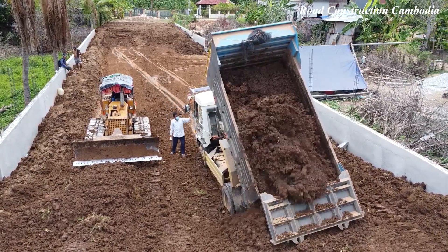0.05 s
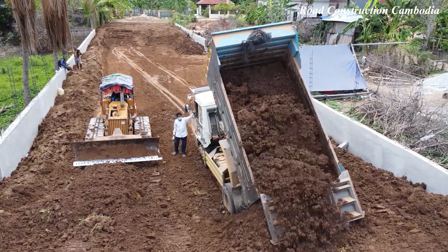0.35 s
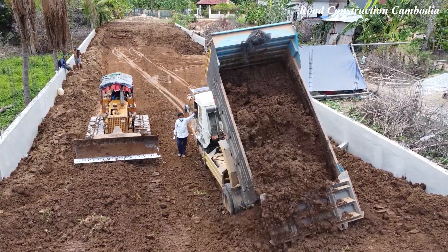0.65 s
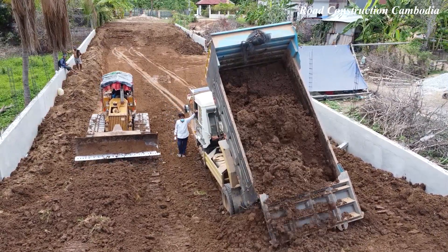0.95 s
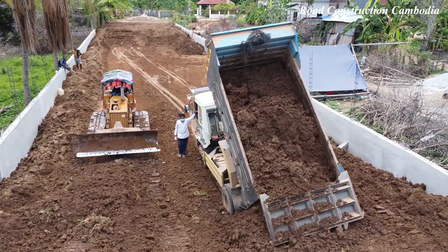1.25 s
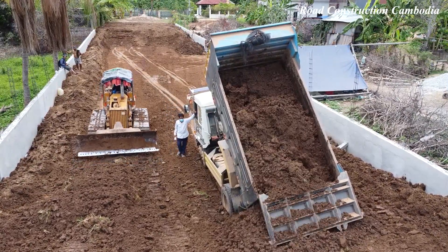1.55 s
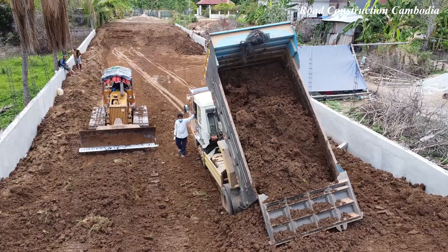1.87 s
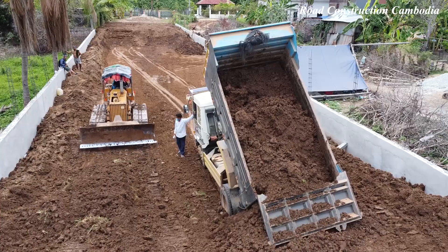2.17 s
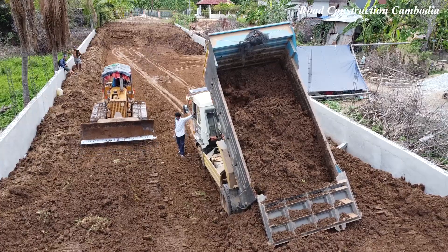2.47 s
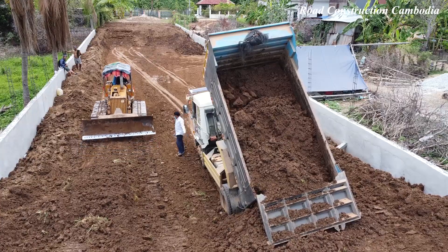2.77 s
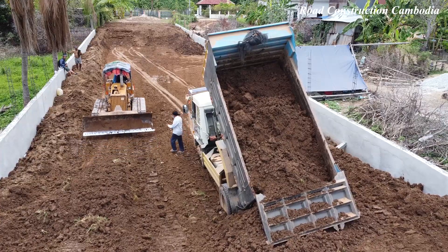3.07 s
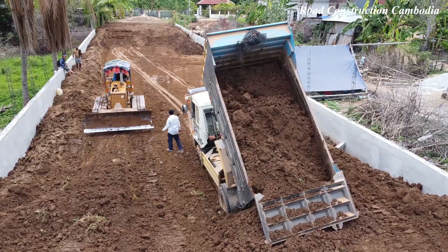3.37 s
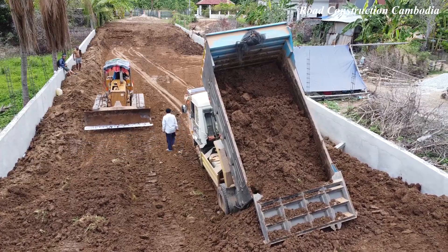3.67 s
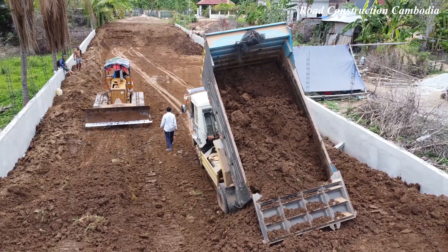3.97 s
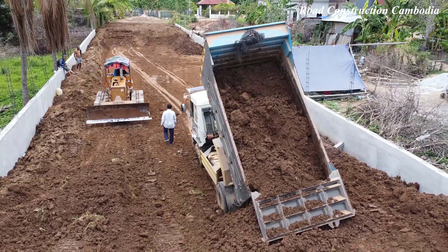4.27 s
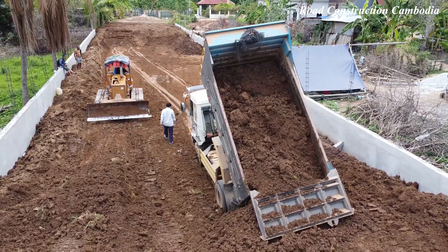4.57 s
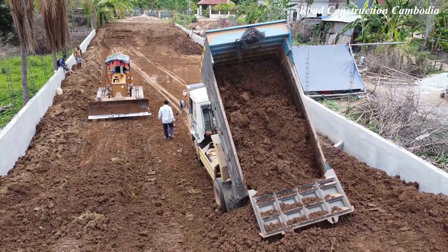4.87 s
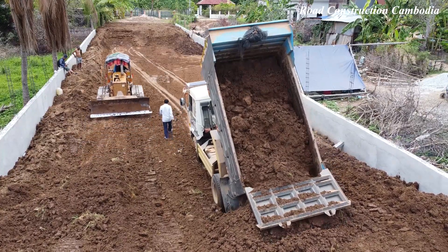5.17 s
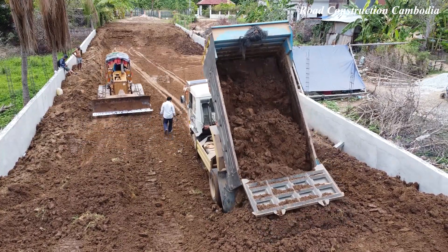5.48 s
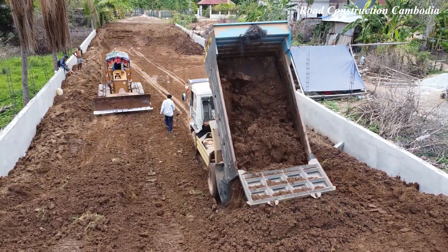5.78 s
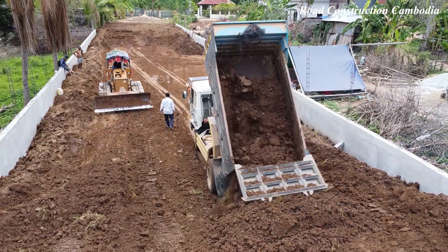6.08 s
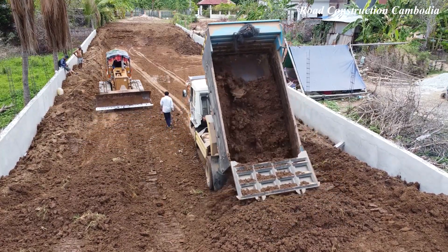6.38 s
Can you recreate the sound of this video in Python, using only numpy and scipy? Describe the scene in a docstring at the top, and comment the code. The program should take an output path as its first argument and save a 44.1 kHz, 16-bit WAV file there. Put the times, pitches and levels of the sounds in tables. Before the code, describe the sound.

A diesel dump truck rumbles and revs while soil and stones slide off its tipped bed, then the hanging tailgate clanks.

```python
"""Dump truck tipping soil

Outdoors on an earthworks site, one microphone near a six-cylinder diesel truck, a bulldozer idling behind.
The air brake puffs, the clutch groans and the truck revs up and pulls forward with its bed tipped: each
firing booms in the exhaust and knocks the block. Soil hisses and scrapes off the bed, clods drum and stones
tick on the steel. Late on, the hanging tailgate clanks and the engine pulls again. A wall echoes faintly."""
import sys
import numpy as np
from scipy import signal
from scipy.fft import rfft, irfft, next_fast_len
from scipy.io import wavfile
from scipy.ndimage import uniform_filter1d

SR = 44100
rng = np.random.default_rng(int(sys.argv[2]) if len(sys.argv) > 2 else 0)


def generate_wav(signal):
    """Clip the signal to [-1, 1] and save it as 16-bit WAV at the path in sys.argv[1]."""
    frames = np.transpose(np.atleast_2d(signal))
    scaled = np.clip(frames, -1, 1) * 32767
    pcm = np.round(scaled).astype(np.int16)
    wavfile.write(sys.argv[1], SR, pcm)


N = 283563
T = np.arange(N) / SR
FFT_SIZE = next_fast_len(N, True)
HZ = np.fft.rfftfreq(FFT_SIZE, 1 / SR)
IDLE_HZ, RUMBLE_IDLE_DB = 25, -43.5  # the truck's firing rate and rumble at idle

# faint chirping in the background: start_s, length_s, chirps_per_s, pitch_hz, level_db
CHIRP_SPELL = (.775, 1.65, 9.6, 4060, -74)
# spectrum of the idling bulldozer: frequency_hz, level_db
DOZER_COLOUR = [(20, -28), (40, -1), (80, 6.5), (115, -13), (220, -20), (320, -2), (450, -5), (700, -12),
                (1000, -9), (1600, -19), (2600, -29.5), (3600, -46), (15000, -86)]
# spectrum of a thin trickle of soil: frequency_hz, level_db
TRICKLE_COLOUR = [(1500, -13), (3500, -7), (4150, -1.5), (4900, -3), (5500, 0.5), (6400, -2), (7400, -1),
                  (9600, -4), (10400, -7.5), (12000, -6.5), (15500, -13.5)]
# spectrum of a full slide: frequency_hz, level_db
SLIDE_COLOUR = [(1500, 5), (3100, -0.5), (3600, -6.5), (4200, -0.5), (4950, -3), (5550, 3), (6000, 0),
                (6400, .5), (7500, -1.5), (9600, -2.5), (10400, -9.5), (11500, -4.5), (13500, -9.5),
                (15500, -13)]
# slides of loose soil: peak_s, rise_s, fall_s, level_db
SOIL_SLIDES = [(.02, 0.11, 0.12, -55.5), (2.25, 0.076, 0.093, -55), (2.82, 0.31, 0.67, -54.5),
               (3.42, 0.3, 0.18, -50.5), (3.98, 0.13, 0.086, -54.5), (4.46, 0.15, 0.072, -59),
               (4.88, 0.061, 0.078, -60), (5.88, 0.16, 0.13, -60), (6.42, 0.15, 0.1, -67)]
# showers of gravel on the steel: peak_s, rise_s, fall_s, level_db
GRAVEL_SHOWERS = [(3.33, 0.045, 0.05, -55), (3.42, 0.04, 0.065, -49.5), (3.99, 0.031, 0.052, -52)]
# falls of clods: peak_s, rise_s, fall_s, level_db
CLOD_FALLS = [(3.38, 0.26, 0.1, -33.5), (3.605, 0.032, 0.068, -26.5), (3.99, 0.092, 0.077, -32.5)]
# bed panels booming under the clods: pitch_hz, width_hz, level_db
PANEL_MODES = [(155, 18, -2.5), (184, 19, -2.5), (213, 16, -1.5), (353, 22, 3.5)]
# the load scraping down the bed: start_s, length_s, attack_s, release_s, level_db
SCRAPE_SPELLS = [(3.08, .42, .12, .08, -52), (3.47, .26, .1, .04, -47.8), (3.68, .95, .06, .45, -56.5),
                 (3.93, .15, .04, .06, -55)]
# resonances of the scraped bed: pitch_hz, width_hz, level_db
BED_MODES = [(1590, 100, 8), (2160, 210, 9.5), (2620, 200, -1), (3020, 200, 0)]
# spectrum of the scrape's hiss: frequency_hz, level_db
SCRAPE_COLOUR = [(2000, -20), (4500, -3), (6000, 0), (9500, 1), (12000, -4), (15000, -16)]
# the steel floor moaning under the load: start_s, length_s, attack_s, release_s, level_db
FLOOR_MOAN = (3.14, .52, .05, .14, -39.5)
# resonances of that floor: pitch_hz, width_hz, level_db
FLOOR_MODES = [(897, 30, -8), (943, 58, 6), (1006, 24, 5)]
# stones striking the bed: start_s, level_db, pitch_hz, ring_strength
STONE_HITS = [(0.984, -39, 4500, 1), (2.2395, -41, 6840, .5), (2.9395, -14, 5500, 0.42),
              (3.2535, -26.5, 5100, 1.7), (3.2982, -34, 5500, 1), (3.3064, -21.5, 4080, .3),
              (3.3228, -29, 6500, .4), (3.3345, -20, 7500, .3), (3.3692, -29, 6500, .4),
              (3.397, -20, 4200, .4), (3.404, -27, 8000, .15), (3.4085, -26, 7000, .3),
              (3.4172, -28, 6760, 1), (3.437, -23.5, 3460, 2.8), (3.4525, -30, 4000, 1),
              (3.462, -25, 6876, .4), (3.977, -24, 5800, .6), (4.001, -22, 7000, .3),
              (4.038, -29, 8500, .4), (4.051, -27, 7000, .4), (4.1638, -36, 6280, 0.77),
              (4.368, -40, 4260, 1), (4.441, -40, 9000, 0.32), (4.465, -34, 7600, 0.37),
              (4.8796, -36, 6000, .5), (4.992, -41, 12000, .5), (5.336, -40, 10980, .5),
              (5.8751, -29.5, 6570, 0.56)]
# blows of the hanging tailgate: start_s, level_db, contact_ms
GATE_BLOWS = [(4.930, -33, 1.2), (4.940, -24, 2.2), (4.947, -26, 3.0), (4.956, -24.5, 2.6),
              (4.973, -22.3, 2.6), (4.987, -29, 1.8), (5.003, -24, 2.2), (5.026, -32, 1.0),
              (5.057, -25.3, .2), (5.065, -27.5, .55), (5.083, -31, .8), (5.110, -34, 1.0),
              (5.143, -32, 1.3), (5.219, -30, 1.5), (5.252, -33, 1.8)]
# ringing of the tailgate: pitch_hz, level_db, t60_s
GATE_MODES = [(107.9, -1.5, .1), (137.5, 3, .1), (165, 1.5, .08), (212, 2.5, .09), (310, -3, .06),
              (447, 1, .14), (505, 1, .1), (554, 2, .11), (665, -4, .07), (921, -8, .07), (1055, -11, .06),
              (1280, -11, .06), (1453, -13, .04), (1949, -19, .04), (2315, -17, .06), (2440, -15, .06)]
# the air brake's puff: peak_s, half_width_s, level_db
BRAKE_PUFF = (0.426, 0.051, -43)
# spectrum of the escaping air: frequency_hz, level_db
AIR_COLOUR = [(350, 1), (600, 16.5), (1100, 11.5), (1400, 8), (1650, -6), (2050, 5), (2450, 9), (2800, 0),
              (3300, -16), (3900, -10), (4300, -1), (4750, -11), (5300, -6), (5650, 3.5), (6000, -6),
              (6450, -13), (7100, -7), (9200, -2.5), (11000, -9), (14200, -15), (16000, -22)]
# the clutch taking up: start_s, length_s, attack_s, release_s, level_db
CLUTCH_GROAN = (0.62, 0.8, 0.07, 0.04, -42.5)
# resonances of the slipping clutch: pitch_hz, width_hz, level_db
CLUTCH_MODES = [(501, 20, 1.5), (526, 13, -4.5), (976, 41, -6), (1456, 22, -10), (1780, 25, -12.5)]
# gear whine from the tipping pump: start_s, length_s, level_db
PUMP_WHINES = [(-.2, 1.3, -50), (1.2, .48, -49.5), (2.07, 1.26, -41.8), (3.2, .6, -46), (3.8, .4, -47)]
# centre and swell of the turbocharger's hiss: time_s, pitch_hz, swell_db
TURBO_SPOOL = [(0, 5400, 1), (.6, 5400, -2), (1.5, 5450, 2), (2.85, 5450, 1), (3.15, 5940, -6.5),
               (3.7, 6030, -6), (4.4, 6238, 0), (5.3, 6330, 0.5), (5.75, 6400, -3), (6.1, 6560, -2),
               (6.43, 6650, 0)]
# speed of the truck's engine: time_s, firing_hz
ENGINE_SPEED = [(0.0, 24.97), (1.0, 24.97), (1.1, 26.6), (1.29, 31.4), (1.5, 33.7), (1.74, 37.05),
                (2.0, 44.8), (2.22, 49.5), (2.48, 51.1), (3.05, 47.8), (3.25, 49.2), (3.55, 61),
                (3.67, 62.5), (3.87, 54.2), (4.68, 33.6), (4.8, 33.6), (5.1, 40.3), (5.3, 35), (5.52, 32.2),
                (5.68, 34.5), (5.93, 43.6), (6.3, 43.3), (6.43, 46)]
# extra strain as the truck creeps forward, then pulls away from the heap: time_s, boost_db
ENGINE_STRAIN = [(0, -1.5), (2.6, 1.33), (3.3, 2), (4.2, -0.5), (4.62, -0.4), (4.76, 3), (4.98, 1.5),
                 (5.2, 7), (5.9, 6.5), (6.43, 5)]
# each cylinder's knock, in firing order: level_db
CYLINDER_KNOCKS = [0, 2.4, -2.2, .6, 2.6, -2.2]
# spectrum of the shaking engine and chassis: frequency_hz, level_db
RUMBLE_COLOUR = [(40, -25), (70, 12), (110, -3), (150, -1), (210, 1.5), (255, -4), (300, 3.5), (350, 2.5),
                 (420, -13), (520, -7), (750, -32), (1500, -77)]
# spectrum of the diesel knock: frequency_hz, level_db
KNOCK_COLOUR = [(250, -1), (480, -4.5), (620, -1), (730, -5.5), (880, -2), (1000, -4), (1200, -6),
                (1600, -15), (2000, -19), (2600, -21.5), (3100, -28.5), (3600, -69), (6000, -58),
                (15000, -80)]
# spectrum of the knocks that ring the block: frequency_hz, level_db
BLOCK_DRIVE_COLOUR = [(150, -4), (300, 10.0), (2000, -1.0), (3500, -21.0)]
# ringing of the engine block: pitch_hz, width_hz, level_db
BLOCK_MODES = [(310, 120, -6.5), (435, 60, -17), (544, 35, -9.5), (626, 52, -9.5), (963, 74, 0.5),
               (1130, 44, -11.5), (1300, 140, -13.5), (1446, 31, -13), (1974, 22, -16)]
# spectrum of turbulent gas in the exhaust pipe: frequency_hz, level_db
PIPE_COLOUR = [(22, -45), (30, -21), (37, -4), (45, -2), (62, 0), (84, 0), (105, -3), (140, -6)]
# how strongly the pipe passes a tone: pitch_hz, level_db
PIPE_RESPONSE = [(25, -63), (30, -44), (37, -42.5), (44, -30.5), (54, -29), (66, -31), (90, -29.5),
                 (97, -33.5), (102, -38.5), (130, -46)]
# weaker exhaust tones, against the rumble at high revs: firing_multiple, level_db
EXHAUST_OVERTONES = [(1.5, -9), (2.5, -16.5), (3, -10), (3.5, -14), (4, -17.5), (4.5, -18), (6, -17),
                     (7, -14.5)]


def gain_of(db):
    """Decibels to amplitude."""
    return 10 ** (np.asarray(db) / 20)


def unit_rms(x):
    """Scales to an rms of one."""
    return x / np.sqrt(np.mean(x ** 2) + 1e-20)


def noise():
    """White noise."""
    return rng.standard_normal(N)


def impulses(per_s):
    """Single-sample clicks at random times."""
    return rng.random(N) < per_s / SR


def filtered(x, response):
    """Applies a frequency response given on HZ."""
    return irfft(rfft(x, FFT_SIZE) * response, FFT_SIZE)[:N]


def butterworth(x, order, corner_hz, kind="low"):
    """A causal low-, high- or band-pass."""
    return signal.sosfilt(signal.butter(order, corner_hz, kind, fs=SR, output="sos"), x)


def shelved(x, corner_hz, db):
    """Changes the treble above a corner by a gain that may move in time."""
    treble = filtered(x, 1 / (1 + (corner_hz / (HZ + 1)) ** 8))
    return x + (gain_of(db) - 1) * treble


def coloured(x, colour):
    """Filters by a spectrum that falls steeply past its last point; rms one."""
    hz, db = np.transpose(colour)
    shape = gain_of(np.interp(np.log(HZ + 1), np.log(hz), db))
    return unit_rms(filtered(x, shape / np.maximum(HZ / hz[-1], 1) ** 4))


def resonances(x, modes):
    """Passes x through a bank of resonances; rms one."""
    response = sum(gain_of(db) / np.sqrt(width) * 1j * HZ * width / (hz ** 2 - HZ ** 2 + 1j * HZ * width)
                   for hz, width, db in modes)
    return unit_rms(filtered(x, response))


def rubbed(modes, slips_per_s):
    """Many small slips or knocks ring a body's resonances; rms one."""
    ring = resonances(noise() * impulses(slips_per_s), modes)
    top_hz = 1.08 * max(hz for hz, _, _ in modes)
    return unit_rms(butterworth(ring, 6, top_hz))


def drift(rate_hz):
    """Slow random motion up to a rate; rms one."""
    return unit_rms(filtered(noise(), 1 / (1 + (HZ / rate_hz) ** 4)))


def noise_band(cycles, half_width_hz):
    """Narrow noise around a tone whose phase is given in cycles."""
    return ((drift(half_width_hz) + 1j * drift(half_width_hz)) * np.exp(2j * np.pi * cycles)).real


def steadied(x):
    """Irons out a noise's chance swells, so that like blows come out equally strong."""
    return x / np.sqrt(abs(uniform_filter1d(x ** 2, size=SR // 200)) + 1e-9)


def curves(rows):
    """One value a sample for each column after a table's time column."""
    times, *columns = np.transpose(rows)
    return [np.interp(T, times, column) for column in columns]


def lagged(x, lag_s):
    """Follows a control with inertia."""
    return x[0] + signal.lfilter([1], [lag_s * SR, 1 - lag_s * SR], x - x[0])


def held(start_s, length_s, attack_s, release_s, db):
    """An envelope that rises, holds and falls."""
    ramps = np.minimum((T - start_s) / attack_s, (start_s + length_s - T) / release_s)
    return gain_of(db) * np.clip(ramps, 0, 1)


def surges(rows):
    """An envelope of surges that each build to a peak and die away; their powers add."""
    each = [gain_of(db) * np.exp(-np.maximum((peak_s - T) / rise_s, (T - peak_s) / fall_s))
            for peak_s, rise_s, fall_s, db in rows]
    return np.linalg.norm(each, axis=0)


def bursts(firings, decay, floor):
    """An envelope that jumps at each firing and decays over a share of the gap to the next."""
    return floor + np.exp(-(firings % 1) / decay)


def add(mix, start_s, sound):
    """Mixes a sound in at a time."""
    part = mix[round(start_s * SR):][:len(sound)]
    part += sound[:len(part)]


def pedal(firing_hz, pull_hz_per_s=53, coast_hz_per_s=34):
    """Shares 0-1 of pulling (speed climbing) and coasting (fuel cut, speed falling)."""
    climb = lagged(np.gradient(firing_hz) * SR, lag_s=.065)
    return np.clip(climb / pull_hz_per_s, 0, 1), np.clip(-climb / coast_hz_per_s, 0, 1) ** 2


def chirps(fade_s=.15):
    """Faint, even chirping at the back of the site, perhaps an insect in the scrub."""
    start_s, length_s, per_s, hz, db = CHIRP_SPELL
    pulses = abs(np.cos(np.pi * per_s * (T - start_s))) ** 2.9
    return held(start_s, length_s, fade_s, fade_s, db) * pulses * noise_band(hz * T, half_width_hz=170)


def bulldozer(firing_hz=40.9, level_db=-42):
    """A six-cylinder engine idles a little way off, loping once every six firings."""
    firings = np.cumsum(firing_hz * (1 + .0033 * drift(2.8))) / SR
    lope = gain_of(2.2 * np.sin(np.pi * firings / 3))
    return gain_of(level_db) * coloured(noise() * lope * bursts(firings, decay=.75, floor=1), DOZER_COLOUR)


def soil(firing_hz, trickle_db=-69, shaken_idle_db=-81, db_per_octave=20):
    """Soil trickles, slides and is shaken loose by the engine: crumbs and pebbles over a fine hiss."""
    _, coast = pedal(firing_hz)
    shaken = gain_of(shaken_idle_db + db_per_octave * np.log2(firing_hz / IDLE_HZ) - 3 * coast)
    level = np.sqrt(gain_of(trickle_db) ** 2 + shaken ** 2 + surges(SOIL_SLIDES) ** 2)
    crumbs = rng.choice([-1, 1], N) * impulses(per_s=700)
    crumbs = crumbs * gain_of(3 * np.minimum(rng.exponential(1, N), 4.5))
    pebbles = impulses(per_s=28) * gain_of(18 + 7 * rng.random(N))
    flow = np.clip((20 * np.log10(level) + 65) / 9, 0, 1)  # 0 a thin trickle, 1 a broad slide
    grains = noise() + .55 * unit_rms(crumbs) + np.sqrt(flow) * pebbles
    return level * ((1 - flow) * coloured(grains, TRICKLE_COLOUR) + flow * coloured(grains, SLIDE_COLOUR))


def gravel():
    """Small pebbles of unequal size crackle densely on the steel."""
    sizes = gain_of(4.5 * np.minimum(rng.exponential(1, N), 3))
    pebbles = rng.choice([-1, 1], N) * sizes * impulses(per_s=1200)
    return surges(GRAVEL_SHOWERS) * coloured(pebbles, SLIDE_COLOUR)


def scraping(hiss_db=-18):
    """The load drags on the steel bed: the floor moans and a gritty scrape swells and fades."""
    roughness = gain_of(.5 * drift(64))
    grit = rubbed(BED_MODES, slips_per_s=3800) + gain_of(hiss_db) * coloured(noise(), SCRAPE_COLOUR)
    moan = held(*FLOOR_MOAN) * rubbed(FLOOR_MODES, slips_per_s=6300)
    return moan + sum(held(*spell) for spell in SCRAPE_SPELLS) * roughness * grit


def clods():
    """Heavy lumps drum on the panels of the bed."""
    drumming = rubbed(PANEL_MODES, slips_per_s=440)
    return surges(CLOD_FALLS) * unit_rms(np.tanh(drumming / 2))


def stones():
    """Hard, dead ticks on the bed: one sharp snap, a very short ring and a little crumbling."""
    out, t = np.zeros(N), T[:900]
    snap = 1.28 * (t == 0)
    for start_s, db, hz, strength in STONE_HITS:
        crumble = .13 * rng.standard_normal(len(t)) * np.exp(-t / .0014)
        ring = strength * np.sin(2 * np.pi * hz * t) * np.exp(-t / (.000088 * (1 + strength)))
        tick = snap + ring + crumble
        add(out, start_s, gain_of(db) * tick / abs(tick).max())
    return butterworth(out, 2, [2200, 14000], "band")


def tailgate(hinge_rattle=.5):
    """Soft blows on soil wake the gate's low modes, steel on steel the higher ones; the hinges rattle."""
    out, t = np.zeros(N), T[:SR // 2]
    for start_s, db, contact_ms in GATE_BLOWS:
        corner_hz = 1000 / (2 * contact_ms)  # a shorter contact is brighter
        blow = np.zeros(len(t))
        for hz, mode_db, t60_s in GATE_MODES:
            ring = np.sin(2 * np.pi * hz * t * (1 + .02 * rng.standard_normal()))
            woken = 1 / np.hypot(1, (hz / corner_hz) ** 2) / np.hypot(1, .1 * corner_hz / hz)
            blow += gain_of(mode_db - 60 * t / t60_s) * ring * rng.choice([-1, 1]) * woken
        rattle = butterworth(rng.standard_normal(len(t)), 5, np.clip(corner_hz, 200, 2500))
        rattle = unit_rms(rattle) * np.exp(-t / .011)
        add(out, start_s, gain_of(db) * (blow / np.std(blow[:SR // 50]) + hinge_rattle * rattle))
    return butterworth(out, 12, 2600)


def air_brake(flutter_db=1.2, flutter_hz=45, abruptness=3.4):
    """A short, fluttering gush swells and fades as the release valve opens and shuts."""
    peak_s, half_width_s, db = BRAKE_PUFF
    valve = 1 / (1 + abs((T - peak_s) / half_width_s) ** abruptness)
    return gain_of(db + flutter_db * drift(flutter_hz)) * valve * coloured(noise(), AIR_COLOUR)


def clutch():
    """The plates slip and groan as the drive takes up."""
    return held(*CLUTCH_GROAN) * rubbed(CLUTCH_MODES, slips_per_s=2400)


def pump(firings, meshes_per_firing=16.5, attack_s=.2, release_s=.14):
    """The tipping pump's teeth mesh in step with the crankshaft; play in the gears wavers the whine."""
    level = sum(held(start_s, length_s, attack_s, release_s, db) for start_s, length_s, db in PUMP_WHINES)
    waver = gain_of(2.1 * drift(14))
    return np.sqrt(2) * level * waver * np.sin(2 * np.pi * meshes_per_firing * firings + .22 * drift(25))


def turbo(knock_db, offset_db=-37, low_band_db=2, waver_db=2):
    """Two bands of hiss, an octave apart, climb as the rotor spins up; inertia lags them behind the knock."""
    centre_hz, swell_db = curves(TURBO_SPOOL)
    cycles = np.cumsum(centre_hz) / SR
    high = noise_band(cycles, half_width_hz=380)
    low = noise_band(cycles / 2, half_width_hz=220)
    level_db = lagged(knock_db, lag_s=.55) + offset_db + swell_db + waver_db * drift(6)
    return gain_of(level_db) * (high + gain_of(low_band_db) * low)


def pipe_boom(rumble_db, coast, idle_db=-43):
    """Turbulent gas roughens the exhaust, growing gently with load and easing when the fuel is cut."""
    level_db = idle_db + .46 * (rumble_db - RUMBLE_IDLE_DB) - 3 * coast
    return gain_of(level_db) * coloured(noise(), PIPE_COLOUR)


def exhaust(firings, firing_hz, coast, rumble_db):
    """Low tones sweep through the pipe's response; two uneven manifolds add half orders with the revs."""
    pipe_hz, pipe_db = np.transpose(PIPE_RESPONSE)
    phase = 2 * np.pi * firings
    idling = np.clip(1 - (firing_hz - IDLE_HZ) / 6, 0, 1)
    revved = np.clip((firing_hz - 30) / 18, .1, 1)
    boom_db = np.interp(firing_hz, pipe_hz, pipe_db) - 27 * coast
    octave_db = np.interp(2 * firing_hz, pipe_hz, pipe_db) - 4 - 7.5 * idling - 13 * coast
    boom = gain_of(boom_db + .8 * drift(11)) * np.sin(phase)
    octave = gain_of(octave_db + 1.2 * drift(13)) * np.sin(2 * phase + 2 * np.pi * rng.random())
    upper = sum(gain_of(db + 1.6 * drift(8.7)) * np.sin(multiple * phase + 2 * np.pi * rng.random())
                for multiple, db in EXHAUST_OVERTONES)
    return np.sqrt(2) * (boom + octave + gain_of(rumble_db) * revved * upper)


def chassis_rumble(strokes, rumble_db):
    """Each firing shakes the chassis; part of the shaking repeats with every four-stroke cycle."""
    cycles = strokes / len(CYLINDER_KNOCKS)
    repeating = sum(np.cos(2 * np.pi * (order * cycles + rng.random())) for order in range(20, 100))
    shakes = bursts(strokes, decay=.48, floor=.48) * noise()
    return gain_of(rumble_db) * coloured(shakes + .36 * unit_rms(repeating), RUMBLE_COLOUR)


def diesel_knock(strokes, knock_db, coast, rise_s=.0095, block_db=-7):
    """Each firing knocks and rings the block; the knocks merge under load and soften when coasting."""
    cylinder = gain_of(CYLINDER_KNOCKS)[np.floor(strokes).astype(int) % len(CYLINDER_KNOCKS)]
    smear = (1 + coast) * np.maximum(gain_of(knock_db + 45), 1) ** 1.05
    knocks = cylinder ** (1 / smear) * bursts(strokes, decay=.22 * smear, floor=.125)
    knocks = uniform_filter1d(knocks, size=round(rise_s * SR))
    knocks /= np.sqrt(uniform_filter1d(knocks ** 2, size=SR // 4))  # same power however smeared
    clatter = coloured(knocks * steadied(filtered(noise(), 1 / (1 + (HZ / 3000) ** 8))), KNOCK_COLOUR)
    # the block answers mostly to the top of each knock
    punches = knocks ** 1.35 * steadied(filtered(noise(), HZ < 2200))
    ring = resonances(coloured(punches, BLOCK_DRIVE_COLOUR), BLOCK_MODES)
    metal = clatter + gain_of(block_db) * ring
    return gain_of(knock_db) * shelved(metal, corner_hz=1300, db=-3.5 * coast)


def truck_engine(firing_hz, knock_idle_db=-43.5):
    """The diesel, up front on the microphone, grows with speed and strain and eases when coasting."""
    octaves = np.log2(firing_hz / IDLE_HZ)
    strain_db = curves(ENGINE_STRAIN)[0]
    pull, coast = pedal(firing_hz)
    rumble_db = RUMBLE_IDLE_DB + 9.5 * octaves + .56 * strain_db - .5 * coast
    knock_db = knock_idle_db + 7.5 * octaves + strain_db + .8 * pull - .4 * coast
    firings = np.cumsum(firing_hz * (1 + .001 * drift(10))) / SR
    strokes = firings - .17  # shake and knock fall just behind the exhaust tone
    pipe = exhaust(firings, firing_hz, coast, rumble_db) + pipe_boom(rumble_db, coast)
    body = chassis_rumble(strokes, rumble_db) + diesel_knock(strokes, knock_db, coast)
    return pipe + body + pump(firings) + turbo(knock_db)


def scene(wall_delay_s=.041, wall_db=-14):
    """The site from one spot in the open; all but the stones echo faintly off the boundary wall."""
    firing_hz = curves(ENGINE_SPEED)[0]
    distance_db = -3 * np.maximum(T - 3.7, 0)  # soil and gravel dull as the truck draws away
    hiss = shelved(soil(firing_hz) + gravel(), corner_hz=10000, db=distance_db)
    earth = hiss + clods() + scraping()
    site = truck_engine(firing_hz) + clutch() + air_brake() + tailgate() + bulldozer() + earth + chirps()
    reflected = butterworth(site, 1, [200, 3000], "band")
    echo = gain_of(wall_db) * np.interp(T - wall_delay_s, T, reflected, left=0)
    return (site + stones() + echo)[None]


def record(dry, low_cut_hz=29, top_hz=15900):
    """The mono microphone's bass roll-off, then the band limit."""
    thinned = butterworth(dry, 6, low_cut_hz, "high")
    band_limit = signal.firwin(511, top_hz, window=("kaiser", 9), fs=SR)
    return signal.oaconvolve(thinned, band_limit[None], "same")


dry = scene()
out = record(dry)
generate_wav(out)
```